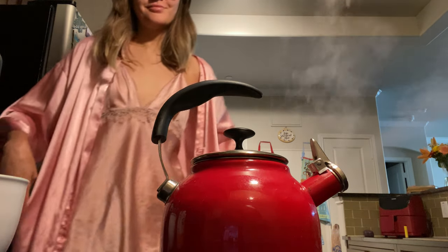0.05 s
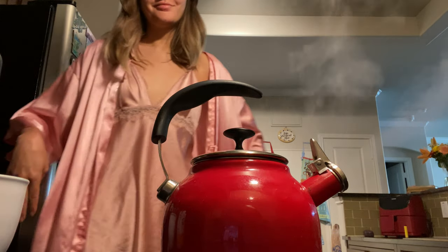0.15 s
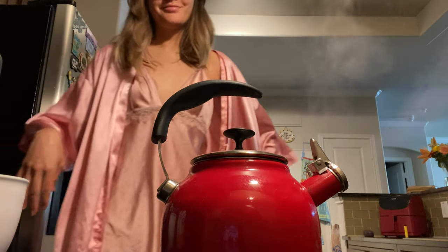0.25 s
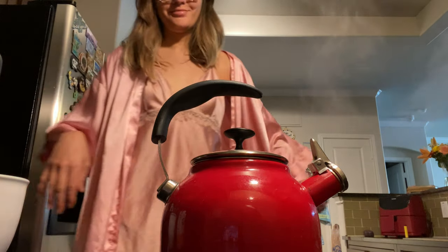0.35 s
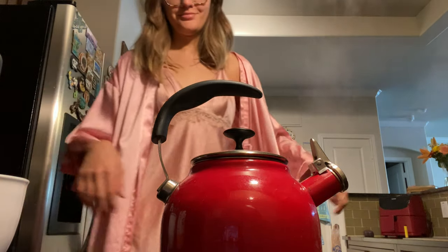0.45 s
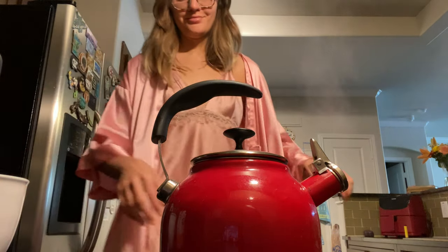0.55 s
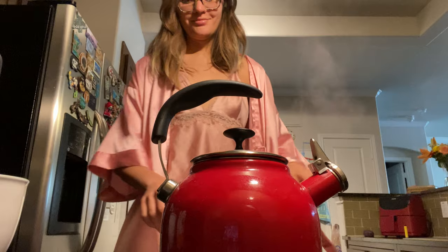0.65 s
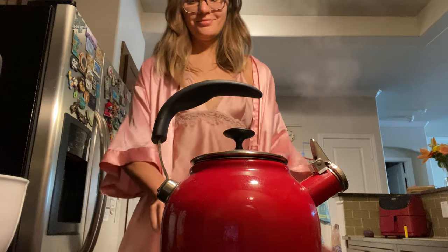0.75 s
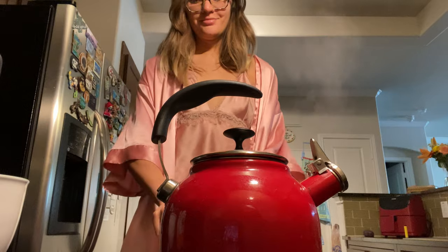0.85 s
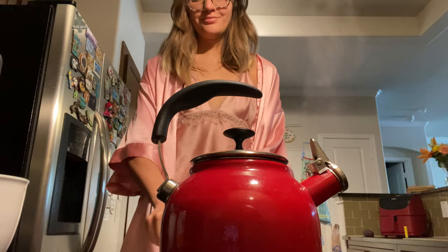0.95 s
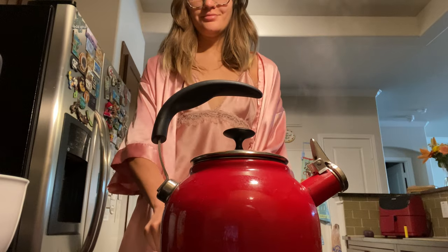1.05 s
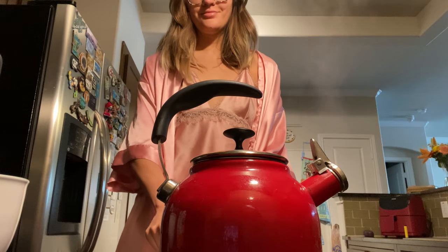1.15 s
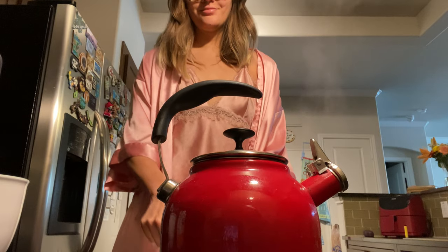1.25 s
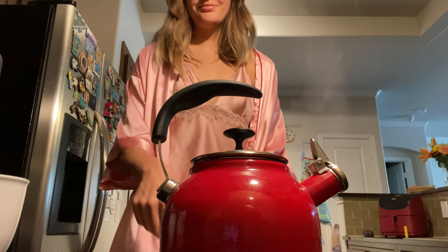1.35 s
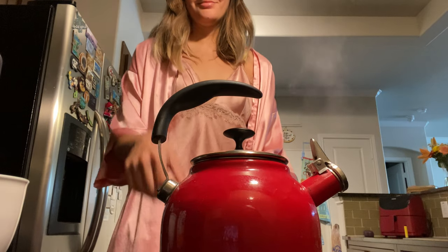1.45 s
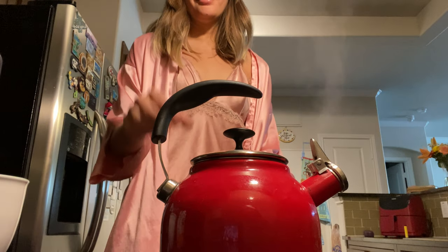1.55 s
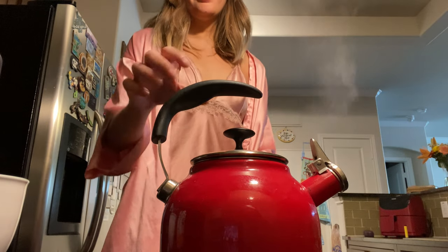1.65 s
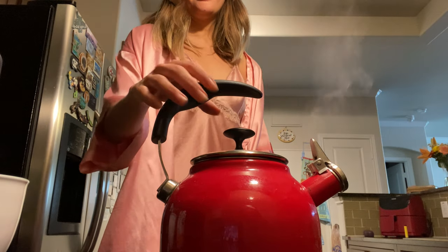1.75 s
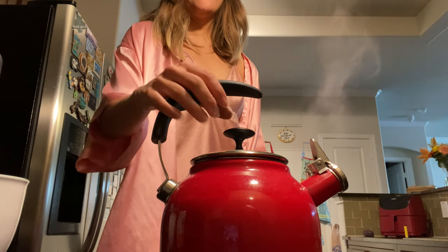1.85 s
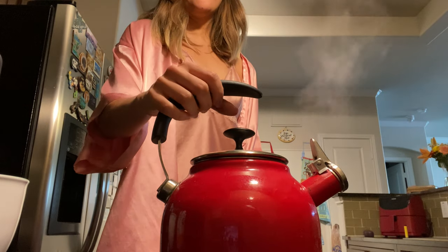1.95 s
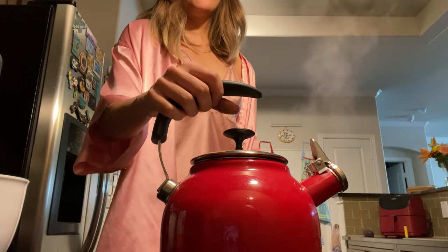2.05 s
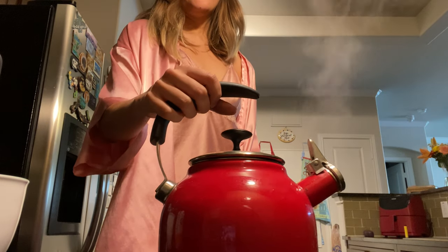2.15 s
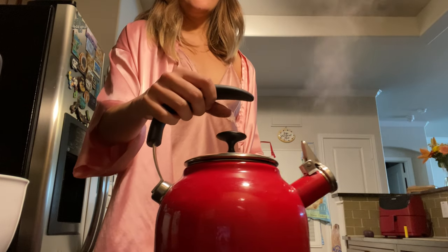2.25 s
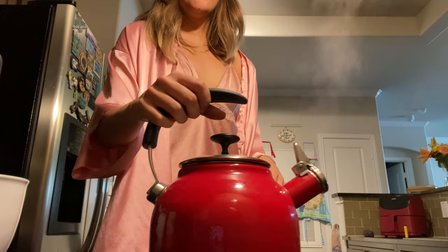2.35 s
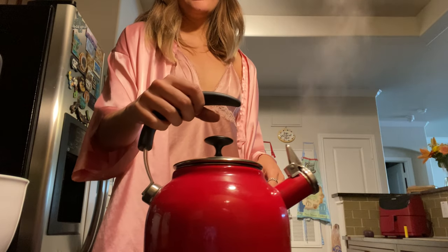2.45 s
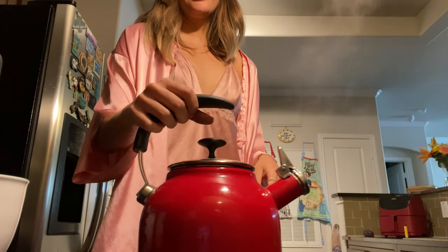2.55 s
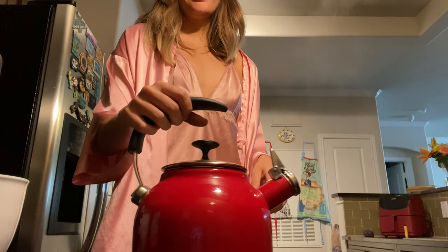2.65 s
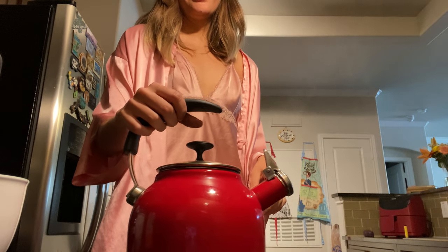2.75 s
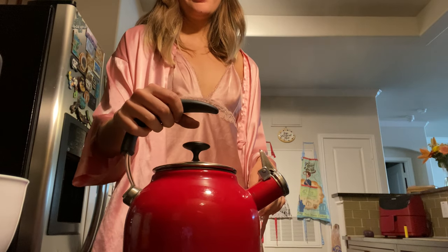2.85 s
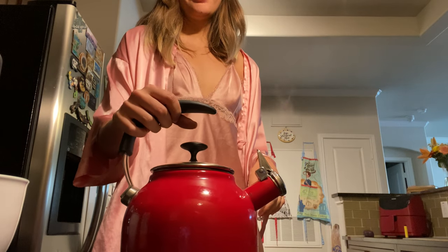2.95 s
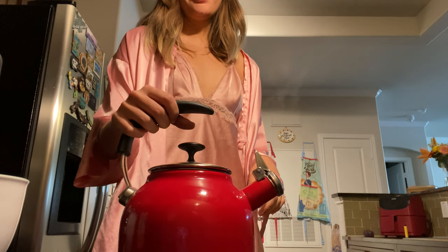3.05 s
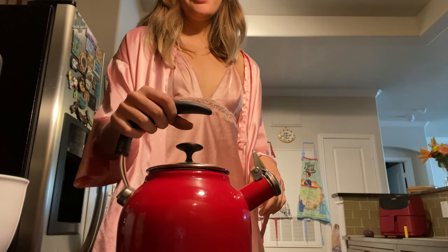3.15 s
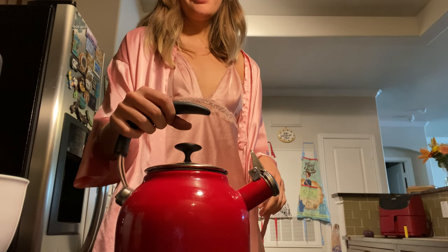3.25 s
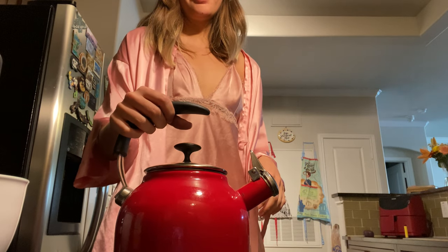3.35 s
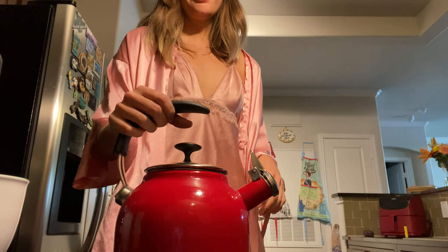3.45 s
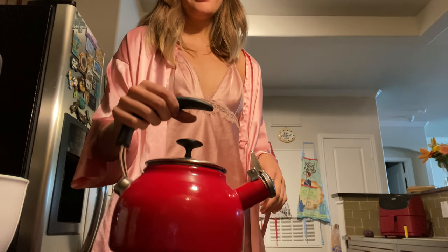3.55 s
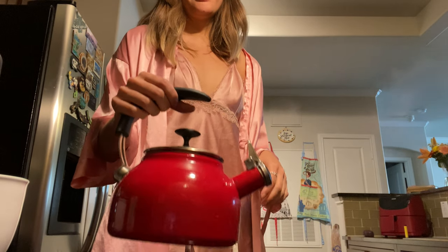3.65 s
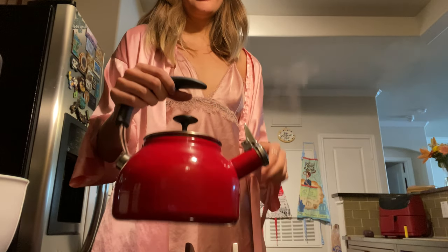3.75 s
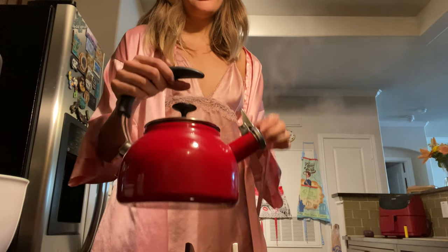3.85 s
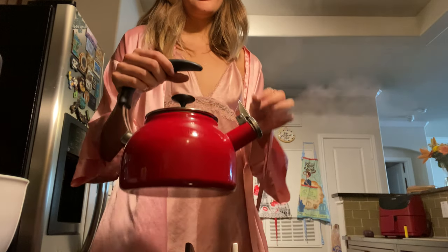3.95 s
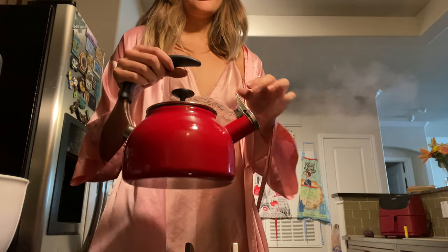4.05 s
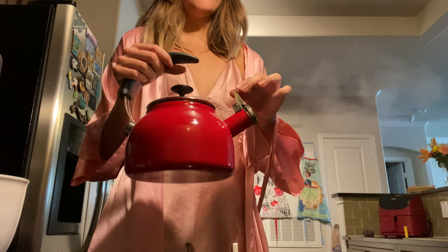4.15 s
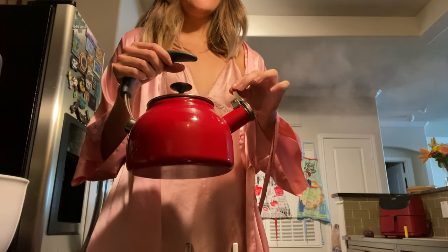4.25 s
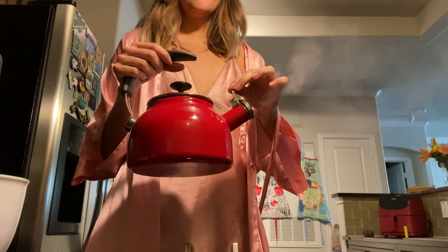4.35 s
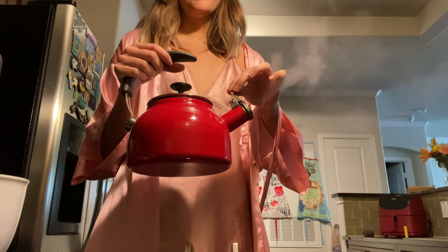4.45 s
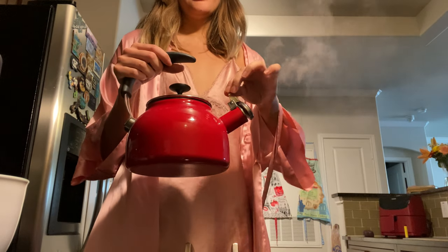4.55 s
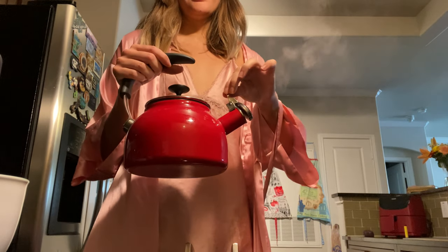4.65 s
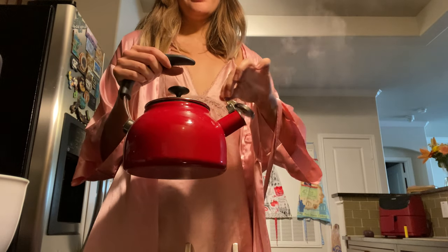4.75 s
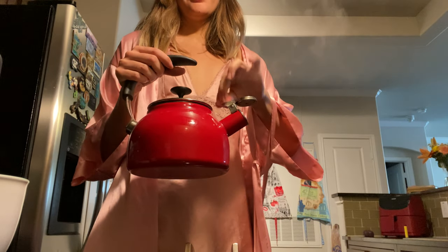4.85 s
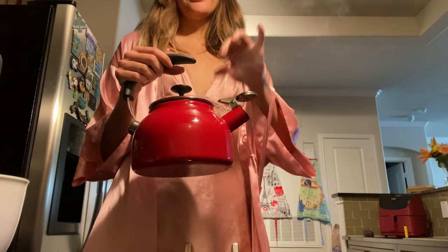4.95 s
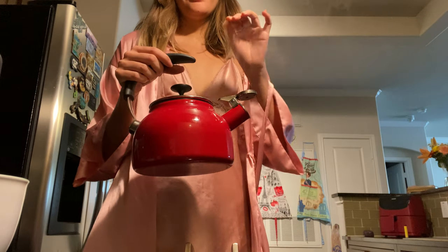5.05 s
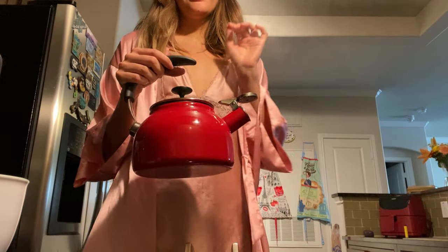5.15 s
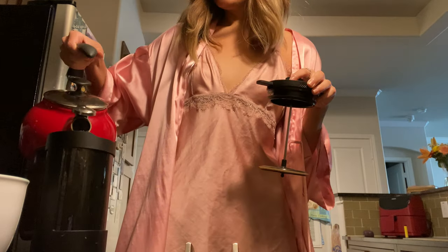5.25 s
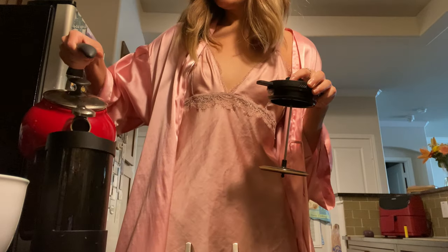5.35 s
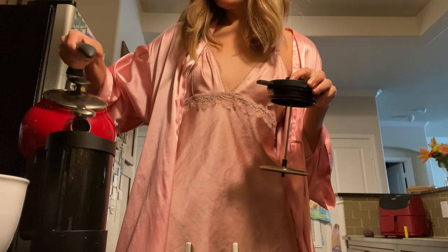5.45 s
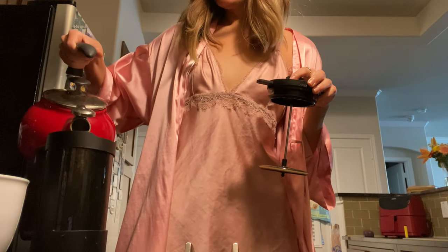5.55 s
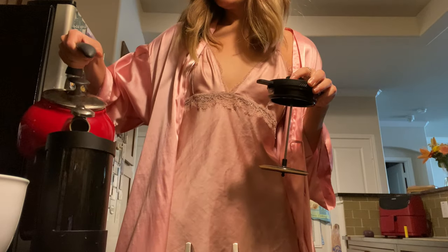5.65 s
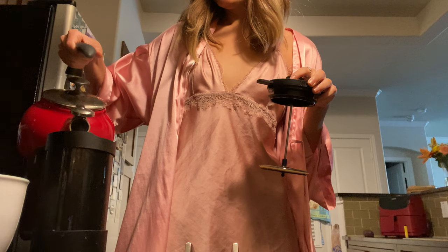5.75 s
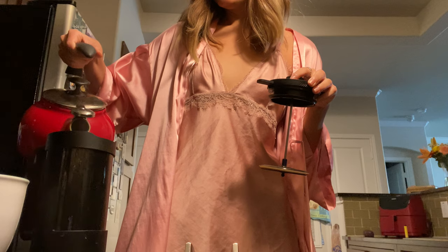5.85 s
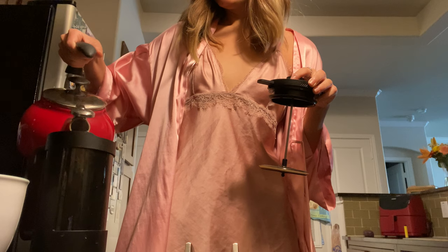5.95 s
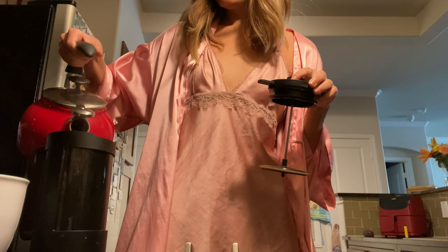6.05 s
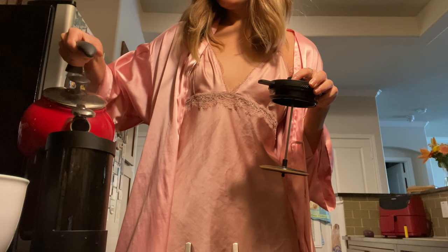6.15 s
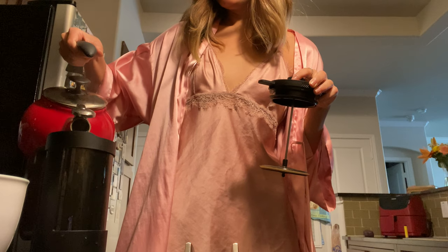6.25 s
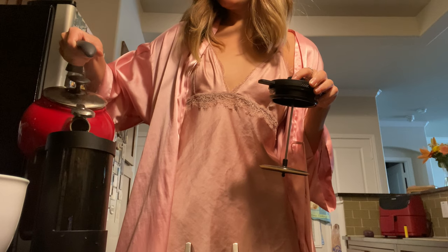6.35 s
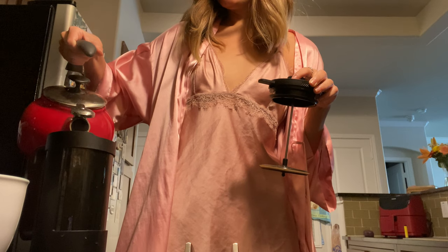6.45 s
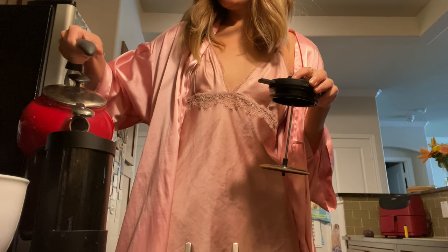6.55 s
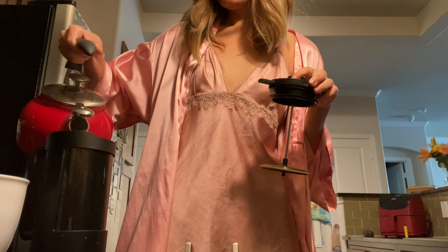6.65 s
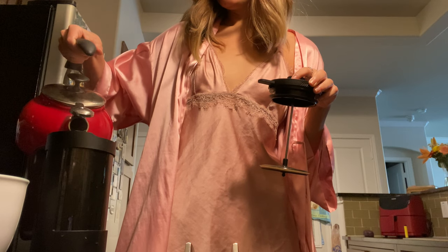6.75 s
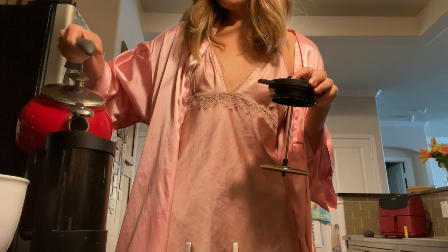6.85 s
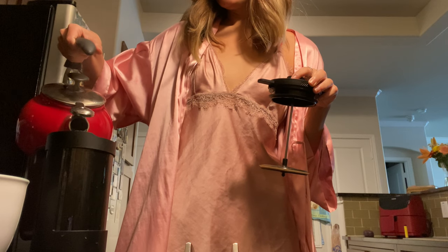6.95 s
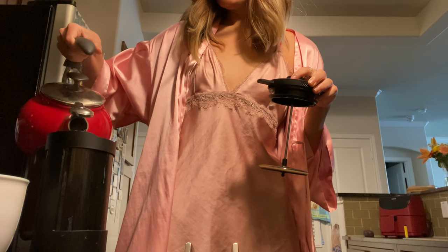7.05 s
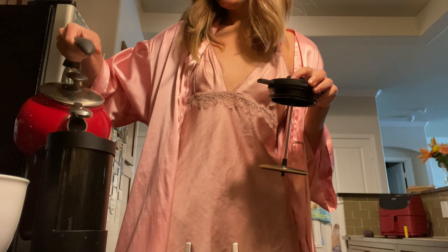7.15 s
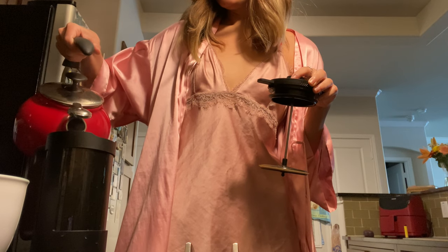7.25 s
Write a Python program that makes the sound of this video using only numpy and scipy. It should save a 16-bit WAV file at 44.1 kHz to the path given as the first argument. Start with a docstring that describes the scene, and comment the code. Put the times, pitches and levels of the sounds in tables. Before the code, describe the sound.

A stove kettle whistles shrill and wavering, sinks into a breathy hiss as it is lifted, then a metal click and hot water gurgling into a tall vessel.

```python
"""A steam jet whistles in the cap of a steel kettle on a kitchen stove: harmonics of one unsteady pitch.
Lifted off the heat, the whistle sinks, turns breathy and dies amid hiss and a spout-cavity note.
Something low by the stove bumps shut and the spout cap clicks open: noise bursts and damped modes.
Hot water plops into a tall coffee press whose air-column note rises as it fills, with bubbles and spray.
Underneath, water seethes as low noise and an appliance hums in steady partials."""
import sys
import numpy as np
from scipy import signal
from scipy.fft import rfft, irfft, next_fast_len
from scipy.io import wavfile
from scipy.ndimage import map_coordinates

SR = 44100
rng = np.random.default_rng(int(sys.argv[2]) if len(sys.argv) > 2 else 0)


def int16_out(signal):
    """Quantize to a 16-bit WAV file."""
    q = np.round(np.clip(np.atleast_2d(signal).T, -1, 1) * 32767)
    wavfile.write(sys.argv[1], SR, q.astype(np.int16))


N = 321489
TIME = np.arange(N) / SR
SIDES = np.array([[.5], [-.5]])  # left and right microphone


def amp(db):
    """Level: decibels converted to an amplitude ratio."""
    return 10 ** (np.asarray(db) / 20)


def unit(x):
    """Normalisation: a signal scaled to rms 1."""
    return x / np.sqrt(np.mean(x ** 2) + 1e-20)


def along(points, hz):
    """Spectral interpolation: (f, value) points joined on a logarithmic frequency axis."""
    f, v = np.transpose(points)
    return np.interp(np.log(hz + 1), np.log(f + 1), v)


def curves(rows):
    """Time interpolation: one value per sample for each column after the time."""
    s, *columns = np.transpose(rows)
    return [np.interp(TIME, s, column) for column in columns]


def bell(x, centre, width):
    """Gaussian window: a smooth hump of height 1, down to 1/e at one width from its centre."""
    return np.exp(-((x - centre) / width) ** 2)


def wobble(rate):
    """Band-limited fluctuation: a smooth random curve of rms 1 with rate knots a second."""
    knots = rng.standard_normal(int(N * rate / SR) + 4)
    return unit(map_coordinates(knots, [TIME * rate]))


def filtered(x, response):
    """Linear filtering: the spectrum multiplied by a response of frequency."""
    n = x.shape[-1]
    m = next_fast_len(n + 8192)
    spectrum = rfft(x, m) * response(np.fft.rfftfreq(m, 1 / SR))
    return irfft(spectrum, m)[..., :n]


def noise(spectrum, size=N):
    """Coloured noise: white noise shaped by a spectrum and scaled to rms 1."""
    white = rng.standard_normal(size)
    return unit(filtered(white, lambda hz: amp(along(spectrum, hz))))


def wide(spectrum, apart):
    """Partial coherence: stereo noise; apart is the power share the sides hold in opposition."""
    apart = np.clip(apart, 0, 1)
    mid = np.sqrt(1 - apart) * noise(spectrum)
    side = np.sqrt(apart) * noise(spectrum)
    return np.array([mid + side, mid - side])


def fade(t, t60):
    """Exponential decay: a fall of 60 dB in t60."""
    return np.exp(-np.log(1000) * t / t60)


def ring(modes, attack, scatter_db, scale=1, size=SR // 2):
    """Modal synthesis: a sum of damped sines, excited at new strengths every time."""
    hz, db, t60 = np.transpose(modes)[:, :, None]
    t = np.arange(size) / SR
    strength = amp(db + scatter_db * rng.standard_normal(db.shape))
    waves = strength * np.sin(2 * np.pi * hz * scale * t) * fade(t, t60)
    return waves.sum(0) * (1 - np.exp(-t / attack))


def burst(spectrum, t60):
    """Broadband impact: a puff of coloured noise with a fast rise and exponential decay."""
    t = np.arange(SR // 3) / SR
    return noise(spectrum, size=len(t)) * fade(t, t60) * (1 - fade(t, t60 / 10))


def bubble(hz, cycles):
    """Bubble resonance: a small bubble rings for a few cycles and rises in pitch."""
    t = np.arange(SR // 30) / SR
    age = t * hz / cycles
    tone = np.sin(2 * np.pi * hz * t * (1 + 0.085 * np.minimum(age, 1)))
    return tone * fade(age, 0.89) * (1 - fade(age, 0.18))


def add(track, s, sound):
    """Superposition: a sound mixed into a track at time s."""
    part = track[round(s * SR):][:len(sound)]
    part += sound[:len(part)]


def place(x, left_db, lag_ms):
    """Stereo localisation: a level difference and a delay of the left microphone behind the right."""
    def response(hz):
        return amp(SIDES * left_db) * np.exp(-2j * np.pi * hz * SIDES * lag_ms / 1000)
    return filtered(x, response)


# reverberation time of the room [f/Hz, t60/s]
ROOM_DECAY = [(150, 0.82), (1000, 0.46), (4000, 0.48), (12000, 0.093)]


def kitchen(x):
    """Diffuse reverberation: decaying noise tails, partly shared by the two microphones."""
    hz, t, z = signal.stft(rng.standard_normal((3, SR // 2)), SR, nperseg=256)
    decay = fade(t, along(ROOM_DECAY, hz)[:, None])
    tails = signal.istft(z * decay, SR, nperseg=256)[1]
    tail = tails[:2] + 0.63 * tails[2]
    tail = tail / np.linalg.norm(tail[0])
    tail = np.pad(tail, ((0, 0), (SR // 300, 0)))  # the first reflections arrive late
    return signal.fftconvolve(x[None], tail, axes=1)[:, :N]


# steady partials of the appliance [f/Hz, mean rms level/dB]
HUM_PARTIALS = [(59.5, -71), (119.6, -58.5), (262, -63.5), (328, -67)]
# spectrum of the still air [f/Hz, relative level/dB]
AIR_SPECTRUM = [(15, -49), (25, -26), (65, 0), (87, -6), (129, -10), (219, -27), (325, -6), (402, -39),
                (5230, -46.5), (6640, -36.5), (13900, -39.5)]


def room_tone():
    """Steady tones over noise: an appliance hums, its partials drifting, over still kitchen air."""
    hum = 0
    for hz, db in HUM_PARTIALS:
        level = amp(db + 0.65 * wobble(0.98)) * np.sqrt(2)
        hum = hum + level * np.sin(2 * np.pi * hz * TIME + 0.22 * wobble(4.2))
    return hum + amp(-55.0) * wide(AIR_SPECTRUM, apart=0.073)


# spectrum of the seething water [f/Hz, relative level/dB]
SEETHE_SPECTRUM = [(24, -38.5), (40, -5.5), (124, -2), (337, -3.5), (430, -6.5), (1050, -11), (1230, -28.5),
                   (1380, -20.5), (1900, -20), (2470, -42), (4180, -120)]
# spectrum of the swell in the rumble [f/Hz, relative level/dB]
SWELL_SPECTRUM = [(30, -15), (90, 1), (200, -5.5), (370, -0.5), (600, -7.5), (1000, -15.5), (1500, -33),
                  (3000, -62)]
BOIL_DB, LIFT_S, COOL_DB_PER_S, COOLED_DB = -48.5, 3.05, 11, -63  # the seething ebbs off the heat
SURGE_S, SURGE_RISE_S, SURGE_HOLD_S, SURGE_FALL_S, SURGE_DB = 2.225, 0.21, 0.3, 0.13, -38.5


def boiling():
    """Modulated noise: a lumpy low seething that swells once and ebbs when the kettle leaves the heat."""
    surge_times = SURGE_S + np.cumsum([0, SURGE_RISE_S, SURGE_HOLD_S, SURGE_FALL_S])
    surge = np.interp(TIME, surge_times, [0, 1, 1, 0])
    level_db = np.maximum(BOIL_DB - COOL_DB_PER_S * np.maximum(TIME - LIFT_S, 0), COOLED_DB)
    rumble = amp(level_db) * wide(SEETHE_SPECTRUM, apart=0.37)
    rumble = rumble + amp(SURGE_DB) * surge * wide(SWELL_SPECTRUM, apart=0.29)
    lumps = amp(1.7 * wobble(30.15))
    return place(lumps * rumble, left_db=-0.5, lag_ms=0.033)


# dull blows, levels relative within each column
# [t/s, boom level/dB, clatter level/dB, clatter t60/s, latch ring level/dB]
BLOWS = [(0.998, -38, -66, .1, -80), (1.084, -58, -48, .08, -31), (1.111, -52, -33, .05, -27),
         (1.119, -36, -25, .12, -23), (1.1275, -24, -39, .2, -50), (1.1445, -21, -44, .25, -45),
         (2.067, -45, -46, .06, -65)]
# modes of the large panel [f/Hz, relative level/dB, t60/s]
PANEL_MODES = [(84, -7, .6), (108, -1, .3), (121, -2, .5), (237, 1, .08), (420, -13, .1), (678, -23, .25)]
# spectrum of the rattle [f/Hz, relative level/dB]
CLATTER_SPECTRUM = [(120, -26), (200, -1), (429, -15.5), (921, -8), (1600, -13), (3610, -13), (3950, -21.5),
                    (13900, -32.5)]
# modes of the panel's catch [f/Hz, relative level/dB, t60/s]
LATCH_MODES = [(790, -1, .04), (887, 0, 0.075), (1003, -3.5, .04), (1544, -5.5, 0.046)]


def bumps():
    """Impact excitation: blows make a catch ring, rattle and thud, and boom in a large panel by the stove."""
    thud_spectrum = [(50, -9.5), (110, 4.5), (300, -7.0), (600, -14), (2000, -55)]  # f/Hz, level/dB
    boom, clatter = np.zeros((2, N))
    for s, boom_db, clatter_db, t60, latch_db in BLOWS:
        add(boom, s, amp(boom_db) * ring(PANEL_MODES, attack=.003, scatter_db=1))
        add(clatter, s, amp(clatter_db + 3.5) * burst(CLATTER_SPECTRUM, t60))
        add(clatter, s, amp(latch_db) * ring(LATCH_MODES, attack=.001, scatter_db=1))
        # the dull thud grows more slowly with the blow than the panel's ring
        add(boom, s, amp(.5 * boom_db - 18.5) * burst(thud_spectrum, t60=0.2))
    return place(clatter, left_db=4.5, lag_ms=0.2) + amp(-6.0) * kitchen(clatter) + boom


# dull knocks as the kettle leaves the grate [t/s, level/dB]
GRATE_KNOCKS = [(3.445, -30), (3.466, -36.5)]
# spectrum of a knock on the grate [f/Hz, relative level/dB]
GRATE_SPECTRUM = [(45, -14), (100, 9), (250, -3), (520, -4), (750, -15.5), (1500, -31), (4000, -60)]


def lift():
    """Damped impact: the full kettle tips and knocks on the grate as short dull noise."""
    track = np.zeros(N)
    for s, db in GRATE_KNOCKS:
        add(track, s, amp(db) * burst(GRATE_SPECTRUM, t60=0.1))
    return track + amp(-10) * kitchen(track)


# sharp metal contacts, levels relative within each column
# [t/s, snap level/dB, cap ring level/dB, kettle body level/dB]
CONTACTS = [(1.121, -27.5, -46, -70), (2.061, -28.5, -52, -70), (4.846, -23, -57, -64),
            (4.8485, -20, -35.5, -59), (4.856, -44, -35, -33.5)]
# modes of the spout cap [f/Hz, relative level/dB, t60/s]
CAP_MODES = [(898, 2, 0.05), (1455, 0, 0.065), (2020, -8, 0.025), (2690, -15, .04), (4050, -2, .035),
             (4070, -18, .13), (6100, -21, .035)]
# modes of the kettle body [f/Hz, relative level/dB, t60/s]
BODY_MODES = [(184, 5, 0.12), (224.3, -5, 0.17), (296, 7.5, 0.1)]
# spectrum of the metal snap [f/Hz, relative level/dB]
SNAP_SPECTRUM = [(600, -6), (2000, -16.5), (5000, -8), (7500, -6.5), (11000, -2.5), (13000, 7),
                 (15500, 1.5)]


def clicks():
    """Impulsive excitation: sprung metal snaps, rings the cap and knocks on the full kettle."""
    rattle_spectrum = [(500, -1.5), (1500, -2.5), (7500, -4.0), (13000, -11.5)]  # f/Hz, level/dB
    track, body = np.zeros((2, N))
    for s, snap_db, cap_db, body_db in CONTACTS:
        add(track, s, amp(snap_db) * burst(SNAP_SPECTRUM, t60=0.013))
        add(track, s, amp(cap_db - 3.0) * burst(rattle_spectrum, t60=0.13))
        add(track, s, amp(cap_db) * ring(CAP_MODES, attack=.0007, scatter_db=1.5))
        add(body, s, amp(body_db) * ring(BODY_MODES, attack=0.0016, scatter_db=1.0))
    return place(track, left_db=5.0, lag_ms=0.503) + body + amp(-10) * kitchen(track + body)


POUR_S, END_S = 5.24, N / SR  # the stream reaches the press and pours on to the end
FLOW_DB = 1.6 * (TIME - POUR_S)  # the stream grows as the kettle is tilted


def steady(x):
    """Normalisation: a pouring layer scaled by its deviation after the stream starts."""
    return x / np.std(x[TIME > POUR_S])


# the press's air column shortens as it fills [t/s, f/Hz]
COLUMN_PITCH = [(5.3, 451), (5.45, 479), (6.35, 497), (6.5, 511), (7.25, 510)]
# modes of the air column [multiple of the column pitch, relative level/dB, t60/s]
COLUMN_MODES = [(.64, -9.5, 0.036), (1, 3, 0.07), (1.2, -7, 0.034), (1.9, -13.5, .035), (3, -20, 0.036),
                (5.4, -33, 0.034)]


def plop(s, spread):
    """Air-column resonance: a lump of water rings the column at its pitch of the moment, slightly spread."""
    column_hz = np.interp(s, *np.transpose(COLUMN_PITCH))
    scale = column_hz * np.exp(spread * rng.standard_normal())
    return ring(COLUMN_MODES, attack=0.0021, scatter_db=1.2, size=SR // 8, scale=scale)


# spectrum of the droplets, coloured by the vessel [f/Hz, relative level/dB]
SPRAY_SPECTRUM = [(530, -13.5), (850, -8), (1000, 9), (1160, -14.5), (1500, 2.5), (1750, -8), (1950, -2.5),
                  (2170, -13), (2500, -2), (2800, -2), (3050, -10.5), (3550, -9.5), (5500, -13),
                  (8300, -10.5), (10800, -20), (13900, -25)]
# big plops, slap and splash on scales relative to the plop
# [t/s, plop level/dB, slap level/dB, splash level/dB]
BIG_PLOPS = [(5.261, -36.5, -11, -21), (5.296, -28.5, -21, -19), (5.356, -32.5, -28, -28),
             (5.427, -35, 0, -5.5), (5.486, -35, -9, -21), (5.58, -33.5, -10, -22), (5.777, -34, -8, -16),
             (5.828, -24, -18, -14), (6.02, -35, -4, -0.5), (6.114, -33, -8, -12), (6.128, -33, -15, -2),
             (6.192, -31, -12, -16), (6.25, -34.5, -5, -1), (6.327, -27, -8.5, -22),
             (6.375, -24.5, -1.5, -13), (6.384, -24.5, -5, -18), (6.417, -27, -16, -11.5),
             (6.47, -33.5, -10, -6), (6.508, -26, -17, -24), (6.524, -20.5, -15, -26),
             (6.551, -20.5, -7.5, -18.5), (6.652, -29.5, -5, -24), (6.699, -29, -10, -30),
             (6.744, -23, -16, -16), (6.774, -23, -7.5, -17), (6.846, -26.5, -15, -24),
             (6.86, -18, -24, -17), (6.89, -28.5, -14, -11), (6.983, -21, -10, -12),
             (7.054, -23.5, -14, -23), (7.092, -28, -19, -12), (7.144, -22, -22, -16),
             (7.16, -28, -15, -11.5), (7.186, -28, -25, -30), (7.246, -29, -13, -6),
             (7.271, -26.5, -19, -19)]
# spectrum of water hitting water [f/Hz, relative level/dB]
SLAP_SPECTRUM = [(200, -21), (380, 3), (900, 3), (1250, -12), (1600, -5.5), (2200, -17), (4000, -38)]
# single small bubbles that stand out of the spray [t/s, f/Hz, level/dB]
LONE_BUBBLES = [(5.559, 4600, -49), (5.66, 3830, -44), (5.799, 2500, -35), (6.145, 4220, -38),
                (6.159, 2680, -35), (6.628, 2620, -44), (6.641, 1540, -33.5), (7.125, 1800, -41)]
TRAIL_DB, TRAIL_HZ, TRAIL_S = -22, 747, .022  # bubbles in a plop's wake: level, median pitch, mean delay


def big_plops():
    """Cavity excitation: lumps slap the surface, ring the column, drag bubbles under and throw up spray."""
    plops = np.zeros(N)
    for s, db, slap_db, splash_db in BIG_PLOPS:
        add(plops, s, amp(db) * plop(s, spread=0.02))
        add(plops, s, amp(db + slap_db) * burst(SLAP_SPECTRUM, t60=0.027))
        add(plops, s, amp(db + splash_db - 6.5) * burst(SPRAY_SPECTRUM, t60=0.058))
        for delay, tune in zip(rng.exponential(TRAIL_S, size=4), rng.standard_normal(size=4)):
            trail = bubble(TRAIL_HZ * np.exp(.35 * tune), cycles=20)
            add(plops, s + delay, amp(db + TRAIL_DB) * trail)
    for s, hz, db in LONE_BUBBLES:
        add(plops, s, amp(db) * bubble(hz, cycles=47))
        add(plops, s, amp(db - 13) * burst(SPRAY_SPECTRUM, t60=0.028))
    return plops


GURGLE_DB, GURGLE_SWAY_DB = -50, 2.5  # level at the start of the pour and its slow unevenness
BLOB_DB, BLOB_HZ = -7, 640  # large loose bubbles: level against the column's gurgle, median pitch


def gurgle():
    """Random superposition: many small plops ring the column among large loose bubbles."""
    lumps, blobs = np.zeros((2, N))
    for s, size_db in zip(rng.uniform(POUR_S, END_S, size=170), 3 * rng.standard_normal(size=170)):
        add(lumps, s, amp(size_db) * plop(s, spread=0.1))
    times = rng.uniform(POUR_S, END_S, size=90)
    for s, (tune, loud) in zip(times, rng.standard_normal(size=(90, 2))):
        add(blobs, s, amp(3.5 * loud) * bubble(BLOB_HZ * np.exp(0.35 * tune), cycles=14))
    level_db = GURGLE_DB + FLOW_DB + GURGLE_SWAY_DB * wobble(19)
    return amp(level_db) * (steady(lumps) + amp(BLOB_DB) * steady(blobs))


# the stream breaks up and spatters, or runs smooth [t/s, half-length to 1/e/s, spray level change/dB]
STREAM_CHANGES = [(5.356, 0.076, -7), (5.486, 0.088, 4.5), (5.827, 0.076, 5.5), (6.172, 0.031, 13),
                  (6.686, 0.045, -6), (6.881, 0.02, 3), (7.25, 0.031, 3.5)]
DROPLET_DB, FIZZ_DB, SPRAY_SWAY_DB = -59.3, -64.3, 1.9  # levels as the pour starts; slow unevenness
DROPS_PER_S, DROP_SCATTER_DB = 2500, 5  # mean droplet rate; spread of the droplet strengths


def spray():
    """Shot noise: random droplet impulses coloured by the vessel, with fizzing small bubbles."""
    fizz = np.zeros(N)
    times = rng.uniform(POUR_S, END_S, size=500)
    for s, (tune, loud) in zip(times, rng.standard_normal(size=(500, 2))):
        hz = np.clip(1900 * np.exp(0.5 * tune), 650, 9000)
        add(fizz, s, amp(4.8 * loud) * bubble(hz, cycles=28))
    strengths = amp(DROP_SCATTER_DB * np.clip(rng.standard_normal(N), -2, 2))
    drops = (rng.random(N) < DROPS_PER_S / SR) * rng.choice([-1, 1], N) * strengths
    drops = filtered(drops, lambda hz: amp(along(SPRAY_SPECTRUM, hz)))
    spatter_db = sum(db * bell(TIME, s, length) for s, length, db in STREAM_CHANGES)
    change_db = FLOW_DB + SPRAY_SWAY_DB * wobble(22) + spatter_db
    droplets = amp(DROPLET_DB + change_db + 3 * wobble(90)) * unit(drops)
    return droplets + amp(FIZZ_DB + change_db) * steady(fizz)


def pour():
    """Vessel radiation: plops, gurgle and spray leave a narrow press that radiates no deep bass."""
    flowing = np.clip((TIME - POUR_S) / 0.011, 0, 1)
    water = big_plops() + flowing * (gurgle() + spray())
    water = signal.sosfilt(signal.butter(2, 120, "high", fs=SR, output="sos"), water)
    return place(water, left_db=3.8, lag_ms=-0.052) + amp(-8.5) * kitchen(water)


# spectrum of the jet's turbulence [f/Hz, relative level/dB]
HISS_SPECTRUM = [(590, -27.5), (1000, -12.5), (1870, -10.5), (2090, -5.5), (2470, -1.5), (3010, -10.5),
                 (7940, -21), (8480, -20.5), (9060, -62.5), (10700, -20), (13900, -27)]
# water sizzling on the hot wall as the kettle is lifted [t/s, level/dB]
SIZZLE_LEVEL = [(3.45, -79), (3.9, -61), (4.1, -65.5), (4.8, -65), (5.3, -66.5), (6.5, -90)]
# spectrum of that sizzle [f/Hz, relative level/dB]
SIZZLE_SPECTRUM = [(2000, -23), (4000, -8), (7000, -6.5), (11000, -3.5), (13500, -4), (15000, -23)]
# spectrum of a slow jet rushing through the spout [f/Hz, relative level/dB]
RUSH_SPECTRUM = [(400, -31.5), (560, -8), (800, -1.5), (1100, -2.5), (1400, -28)]
# air modes of the spout [multiple of the cavity pitch, relative level/dB]
SPOUT_MODES = [(1, 1), (1.33, -11.5), (1.55, -17)]
FULL_HZ = 1239  # whistle pitch at full steam
HISS_DB, HISS_DB_PER_OCTAVE = -48.5, 13.5  # the hiss grows with the steam speed
RUSH_DB, RUSH_PITCH_HZ, RUSH_WIDTH_HZ = -53, 940, 190  # strongest around this pitch of the whistle
CAVITY_DB, CAVITY_FALL_DB_PER_S = -53, 330  # the spout's own note, and how fast it dies
# the note flares as the jet slows, until the steam stops
FLARE_S, FLARE_DB, FLARE_FALL_DB_PER_S, STEAM_END_S = 4.09, 10.5, 18, 4.35
HOOT_HZ, HOOT_DB = 805, 1  # the lowest mode speaks only from the flare on; level against the spout's note


def cavity_mode(mode_hz):
    """Noise-driven resonance: a narrow band around a mode, its two quadratures swaying at random."""
    phase = 2 * np.pi * np.cumsum(mode_hz) / SR

    def sway():
        return wobble(50) + 0.5 * wobble(330)

    return unit(sway() * np.sin(phase) + sway() * np.cos(phase))


def steam():
    """Jet turbulence: the steam hisses and blows on the spout's cavity, whose note sags in the lift."""
    (pitch,), (sizzle_db,) = curves(WHISTLE_PITCH), curves(SIZZLE_LEVEL)
    hiss_db = HISS_DB + HISS_DB_PER_OCTAVE * np.log2(pitch / FULL_HZ)
    hiss = amp(hiss_db + 1.0 * wobble(6.47)) * wide(HISS_SPECTRUM, apart=0.47)
    sizzle = amp(sizzle_db) * wide(SIZZLE_SPECTRUM, apart=.05)
    rush = amp(RUSH_DB) * bell(pitch, RUSH_PITCH_HZ, RUSH_WIDTH_HZ) * wide(RUSH_SPECTRUM, apart=0.65)
    onset = np.clip((TIME - FLARE_S) / 0.016, 0, 1)
    flare_db = onset * (FLARE_DB - FLARE_FALL_DB_PER_S * (TIME - FLARE_S))
    cavity_db = CAVITY_DB + flare_db - CAVITY_FALL_DB_PER_S * np.maximum(TIME - STEAM_END_S, 0)
    cavity_hz, = curves([(3.4, 2147), (4.1, 2074)])
    modes = sum(amp(db) * cavity_mode(ratio * cavity_hz) for ratio, db in SPOUT_MODES)
    hoot = amp(cavity_db + HOOT_DB) * onset * cavity_mode(np.full(N, HOOT_HZ))
    cavity = amp(cavity_db) * modes + hoot
    breath = place(hiss + sizzle + rush, left_db=1.0, lag_ms=0.07)
    return breath + place(cavity + amp(-16.0) * kitchen(cavity), left_db=2.5, lag_ms=0.13)


# mean fundamental, which follows the steam speed and sinks once the kettle is lifted [t/s, f/Hz]
WHISTLE_PITCH = [(0,1254),(.06,1239),(.16,1198),(.52,1188),(.68,1252),(.85,1220),(1.14,1203),(1.58,1317),(1.78,1268),(1.9,1300),(2.12,1254),(2.27,1324),(2.39,1326),(2.5,1271),(2.73,1222),(2.88,1224),(3.1,1318),(3.2,1321),(3.35,1273),(3.502,1140),(3.517,1027),(3.65,994.7),(3.73,1056),(3.86,916),(3.96,866),(4.03,795),(4.2,722),(4.37,665),(4.45,391)]
# mean strength of the shrill second partial outside its dropouts [t/s, level/dB]
SHRILL_LEVEL = [(0,-31),(.04,-36.5),(.12,-24.5),(.19,-32.5),(.47,-34.5),(.62,-26.5),(.68,-39),(.75,-31),(.83,-24.5),(.96,-24),(1.02,-29),(1.2,-26.5),(1.29,-32.5),(1.33,-43),(1.43,-27.5),(1.51,-25.5),(1.56,-32),(1.64,-24),(1.76,-28.5),(2.03,-25.5),(2.07,-39),(2.15,-38),(2.18,-24),(2.26,-29.5),(2.39,-19),(2.43,-38),(2.48,-27.5),(2.62,-39.5),(2.75,-41),(2.87,-33),(2.92,-29),(2.98,-33.5),(3.11,-39.5),(3.2,-31.5),(3.25,-36),(3.39,-29),(3.47,-37),(3.505,-25),(3.62,-30),(3.73,-24),(3.8,-33.5),(3.88,-45.5),(3.95,-41),(4.0,-33.5),(4.04,-45.5),(4.17,-60.5),(4.35,-56.5)]
# how strongly each weaker partial sounds at each pitch [f/Hz, level/dB]
FIRST_LEVEL = [(420,-75),(600,-53),(680,-41),(735,-41),(775,-34.5),(795,-33.5),(835,-53.5),(900,-55),(1040,-42),(1120,-47),(1280,-52.5),(1330,-65.5)]
THIRD_LEVEL = [(620,-74),(690,-58),(880,-71),(1010,-53.5),(1130,-45),(1200,-43.5),(1240,-46.5),(1270,-48.5),(1300,-62),(1330,-64.5)]
FOURTH_LEVEL = [(690,-80),(785,-56),(820,-55.5),(1040,-52),(1130,-56.5),(1230,-53.5),(1320,-49)]
# the shrill tone drops out briefly [t/s, depth/dB]
TONE_DROPOUTS = [(1.55, 15), (1.805, 15), (2.305, 16.5), (2.66, 9), (3.178, 5)]
# the beam swings between the microphones as the pitch and the bodies near it move
# [t/s, left minus right level/dB]
BEAM_BALANCE = [(.04, -3), (.17, 9.5), (.56, 9.5), (.67, -2.5), (1.13, 5.5), (1.25, 0.5), (2.5, 5.5),
                (2.92, 3), (3.05, -2), (3.47, 7), (3.8, 1)]
# depth of the jet's chug, greatest just below the jump in pitch [f/Hz, depth 0-1]
CHUG_DEPTH = [(800, 0.14), (1030, 0.48), (1170, 0.12)]
SPUTTER_HZ, SPUTTER_SPREAD = 46, .3  # the jet chugs at an uneven rate
DROPOUT_S, THIRD_LAG_S = 0.012, 0.028  # half-length of a dropout; the third partial follows the pitch late
# the weaker and lower the tone, the more unsteady the jet
FULL_DB, FULL_ROUGH, ROUGH_PER_DB, ROUGH_PER_OCTAVE = -22, 0.14, .022, 0.36
SIGH_S, SIGH_LENGTH_S, SIGH_DB = 4.42, .035, -53.5  # the last steam sighs out on a sinking note


def whistle():
    """Self-sustained jet oscillation: turbulence shakes the pitch, chops the level, smears each partial."""
    (pitch,), (shrill_db,), (beam_db,) = curves(WHISTLE_PITCH), curves(SHRILL_LEVEL), curves(BEAM_BALANCE)
    octaves = np.log2(pitch / FULL_HZ)
    dropout_db = sum(db * bell(TIME, s, DROPOUT_S) for s, db in TONE_DROPOUTS)
    first_db, fourth_db = along(FIRST_LEVEL, pitch), along(FOURTH_LEVEL, pitch)
    third_db = np.interp(TIME - THIRD_LAG_S, TIME, along(THIRD_LEVEL, pitch))
    rough = FULL_ROUGH + ROUGH_PER_DB * (FULL_DB - shrill_db) - ROUGH_PER_OCTAVE * octaves
    rough = np.clip(rough, 0, .6)
    # the shake does not shrink with the pitch, so the slow jet sounds the most ragged
    shake_hz = 5 * wobble(45) + 17 * rough * wobble(240) + 10 * rough ** 2 * wobble(70)
    phase = 2 * np.pi * np.cumsum(pitch + shake_hz) / SR
    depth = np.clip(along(CHUG_DEPTH, pitch), 0, 1)
    chug = np.sin(2 * np.pi * np.cumsum(SPUTTER_HZ * np.exp(SPUTTER_SPREAD * wobble(40))) / SR)
    dying = np.interp(TIME, [STEAM_END_S, SIGH_S + SIGH_LENGTH_S], [1, 0])
    sputter = (1 + depth * chug) / np.sqrt(1 + depth ** 2 / 2) * dying

    def smear(k, rate):
        # narrow noise around a partial; each microphone hears its own
        return np.array([wobble(rate) * np.sin(k * phase) + wobble(rate) * np.cos(k * phase) for _ in SIDES])

    def partial(k, db, turn):
        # turn is the phase between the microphones, in radians
        tone = np.sqrt(2 * (1 - rough ** 2)) * np.sin(k * phase - SIDES * turn)
        return amp(db) * sputter * (tone + rough * smear(k, rate=130))

    shrill = partial(2, shrill_db - dropout_db + 1.4 * wobble(50), turn=0)
    slow_db = 30 * octaves  # a slow jet loses its top partials
    weak = [
        (3, third_db, -1.07),
        (4, fourth_db, 1.4),
        (5, third_db - 19 + slow_db, 1),
        (6, fourth_db - 16 + slow_db, -1),
    ]
    others = sum(partial(k, db + 3.4 * wobble(60), turn) for k, db, turn in weak)
    others = others + partial(1, first_db + wobble(50), turn=2 * (pitch / FULL_HZ) ** 2)
    others = others + amp(SIGH_DB) * bell(TIME, SIGH_S, SIGH_LENGTH_S) * smear(2, rate=300)
    direct = place(shrill * amp(SIDES * beam_db), left_db=0, lag_ms=.49) + others
    return direct + amp(-11) * kitchen((shrill + others).mean(0))


def scene():
    """Superposition: every source in the kitchen sounds together, background first."""
    return room_tone() + boiling() + bumps() + lift() + clicks() + pour() + steam() + whistle()


# frequency response of the microphone [f/Hz, relative level/dB]
MICROPHONE_RESPONSE = [(8200, -0.5), (8800, -7.5), (9250, -34), (9800, -5.5), (10400, -2), (13500, -1.5),
                       (14500, -27.5)]
TOP_HZ = 15750  # band limit


def record(dry):
    """Transducer response: the microphone has a narrow treble dip and passes nothing above its band limit."""
    return filtered(dry, lambda hz: amp(along(MICROPHONE_RESPONSE, hz)) * (hz < TOP_HZ))


dry = scene()
out = record(dry)
int16_out(out)
```